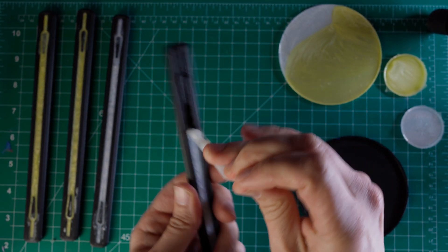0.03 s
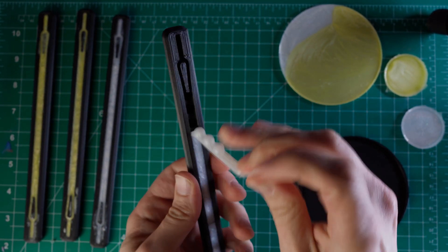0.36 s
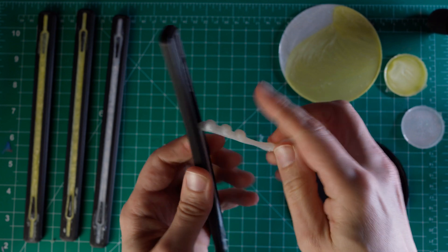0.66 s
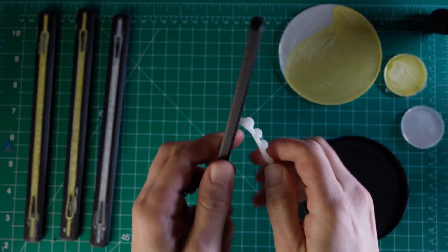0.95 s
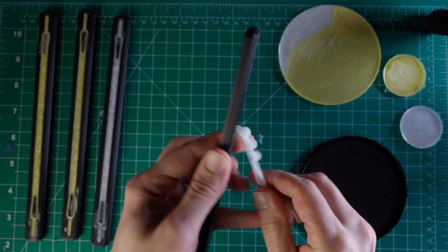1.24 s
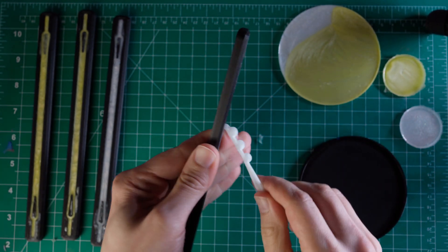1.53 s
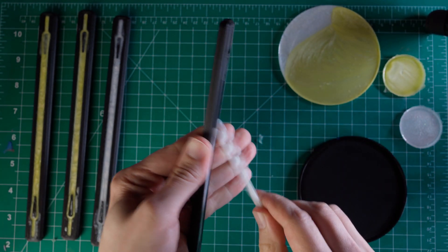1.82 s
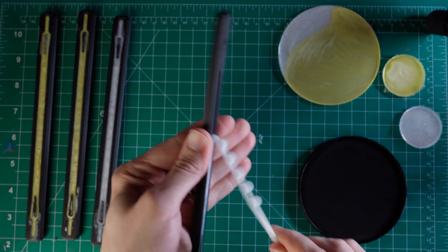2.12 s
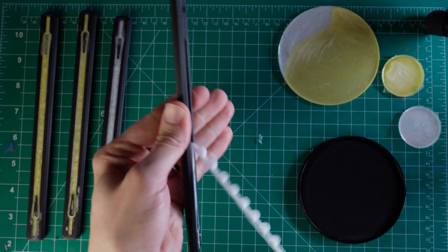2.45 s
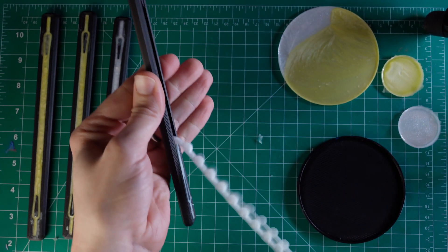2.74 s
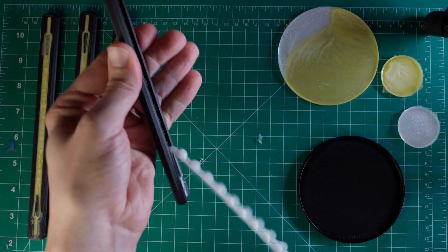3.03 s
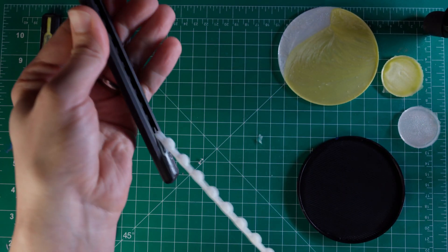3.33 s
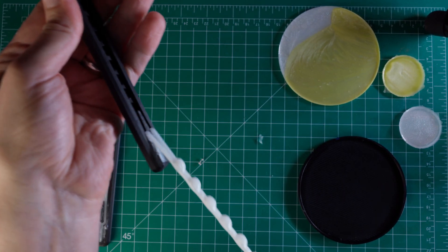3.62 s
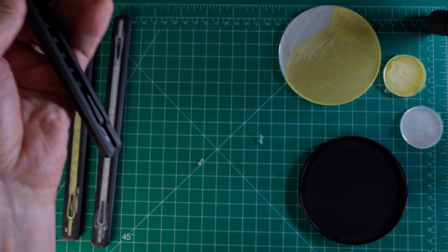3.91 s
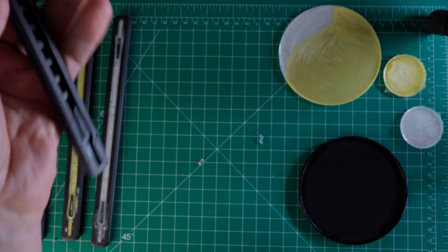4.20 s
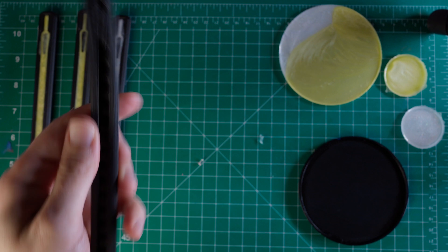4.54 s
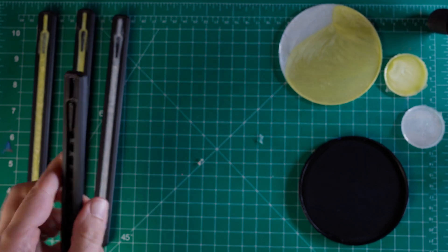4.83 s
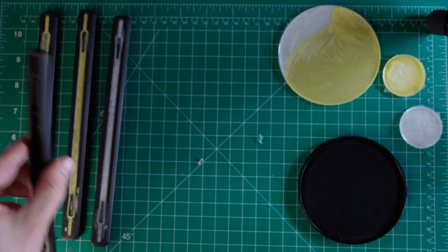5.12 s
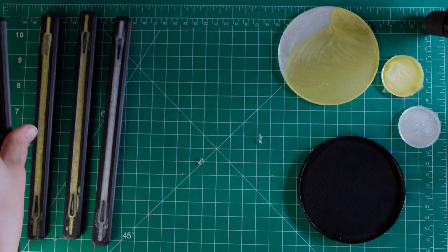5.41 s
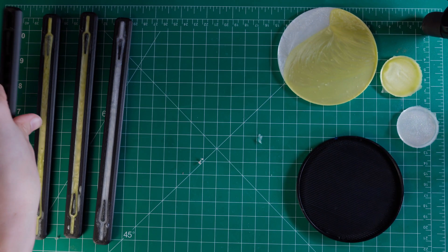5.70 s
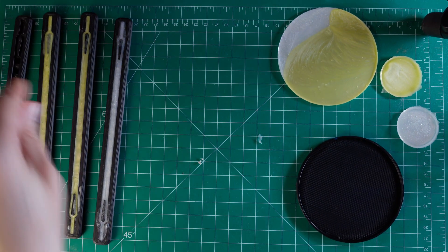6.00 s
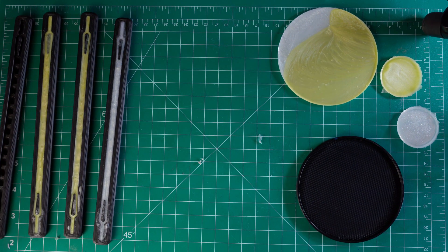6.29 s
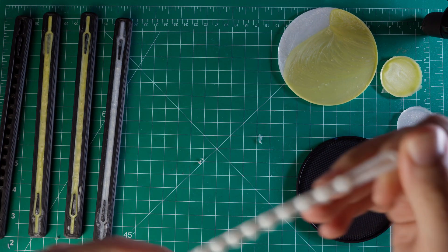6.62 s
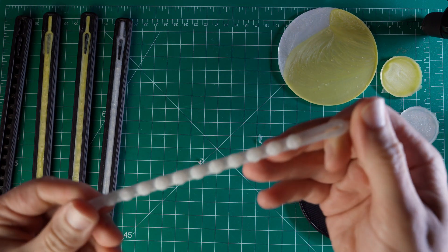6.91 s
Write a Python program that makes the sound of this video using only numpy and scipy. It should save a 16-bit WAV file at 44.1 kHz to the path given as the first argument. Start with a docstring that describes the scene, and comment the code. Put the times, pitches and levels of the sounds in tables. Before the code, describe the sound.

Hands peel a beaded rubber strap out of a long mould, close to the microphone in a small room. Each bead tears loose with a sticky crackle, a sharp pop and a snap, sparse at first and then in a quick run, over hiss and a low bending rumble. The tail rips free with a bright crack. After a lull, the empty mould knocks on the desk and clatters down.

```python
"""A beaded rubber strap is peeled by hand out of a long mould, close by, above a desk in a small room.
Each bead tears loose with a sticky crackle, its pocket pops open and the rubber snaps back.
The strap's ends rip free and flap; the bending mould rumbles.
A steady background hiss swells with each bend and fades after the peeling.
The empty mould is then knocked on the desk, rings, and clatters down beside the others."""
import sys
import numpy as np
from scipy import signal
from scipy.fft import rfft, irfft
from scipy.io import wavfile
from scipy.ndimage import uniform_filter1d

SR = 44100
rng = np.random.default_rng(int(sys.argv[2]) if len(sys.argv) > 2 else 0)


def pcm_store(signal):
    """Save signal as 16-bit PCM."""
    levels = np.round(np.clip(np.atleast_2d(signal), -1, 1) * 32767)
    wavfile.write(sys.argv[1], SR, levels.astype(np.int16).T)


N = 306495
T = np.arange(N) / SR

# Beads leaving their pockets. Each row: time in seconds, pop level in dB, pocket pitch in Hz,
# snap delay in seconds, snap level in dB.
BEAD_RELEASES = [(0.0403, -6, 8220, 0.0024, -12), (.347, -17.5, 7000, 0.0091, -18.5),
                 (1.8799, -12.5, 8910, 0.0096, -21.5), (2.154, -6, 7640, .0046, -12.5),
                 (2.247, -11, 8060, 0.0024, -11), (2.3462, -6, 8470, 0.006, -12),
                 (2.468, -7, 8320, 0.0035, -9), (2.6308, -5.5, 8105, 0.0032, -9),
                 (2.7165, -22, 8900, 0.0016, -9), (2.83, -5.5, 8740, 0.0029, -13),
                 (2.972, -9, 8880, 0.0045, -7), (3.0646, -7.5, 9080, 0.0035, -11),
                 (3.174, -18.5, 8530, 0.0016, -26)]


def undb(db):
    """Decibels to gain."""
    return 10 ** (np.asarray(db) / 20)


def unit(x):
    """Scale to rms 1."""
    return x / np.sqrt(np.mean(x ** 2))


def add(track, start_s, sound):
    """Mix a sound into a track."""
    start = int(start_s * SR)
    sound, start = sound[max(-start, 0):], max(start, 0)
    track[start:start + len(sound)] += sound[:N - start]


def butter(x, order, hz, kind="low"):
    """Butterworth filter."""
    return signal.sosfilt(signal.butter(order, hz, kind, fs=SR, output="sos"), x)


def colour(x, points, size=4096):
    """Minimum-phase filter through (Hz, dB) points; keeps the power of white noise."""
    hz, db = np.transpose(points)
    grid_hz = np.maximum(np.arange(size // 2 + 1) * SR / size, 1)
    gain = undb(np.interp(np.log(grid_hz), np.log(hz), db))
    cepstrum = irfft(np.log(gain))
    cepstrum[1:size // 2] *= 2
    cepstrum[size // 2 + 1:] = 0
    response = irfft(np.exp(rfft(cepstrum)))
    return signal.fftconvolve(x, response / np.linalg.norm(response))[:len(x)]


def resonate(x, hz, width_hz):
    """One resonance, gain 1 at its centre."""
    q = hz / min(width_hz, .3 * SR)
    return signal.lfilter(*signal.iirpeak(min(hz, .45 * SR), q, SR), x)


def grit(size, spread_db):
    """Noise of tiny clicks of uneven size."""
    return unit(rng.standard_normal(size) * undb(spread_db * np.minimum(rng.exponential(size=size), 5)))


def walk(rate_hz):
    """Slow random wander, rms 1."""
    hold = int(SR / rate_hz)
    steps = np.repeat(rng.standard_normal(N // hold + 1), hold)
    return unit(uniform_filter1d(uniform_filter1d(steps, hold), hold)[:N])


def burst(noise, decay_s):
    """Decaying noise whose energy depends only on the decay time."""
    fade = np.exp(-T[:len(noise)] / decay_s)
    return noise * fade * np.linalg.norm(fade) / np.linalg.norm(noise * fade)


def ring(hz, scatter, decay_s, size=4096):
    """Damped sine, randomly detuned."""
    pitch_hz = hz * (1 + scatter * rng.standard_normal())
    return np.sin(2 * np.pi * pitch_hz * T[:size]) * np.exp(-T[:size] / decay_s)


def envelope(start_s, end_s, attack_s, release_s):
    """Swell up to the start, hold to the end, die away."""
    return np.exp(np.minimum(T - start_s, 0) / attack_s - np.maximum(T - end_s, 0) / release_s)


def panned(db):
    """Stereo gains, left above right by db."""
    return undb(np.array([[db], [-db]]) / 2)


def stereo_noise(points, side_db, grain_db):
    """Coloured noise, wider in the bass."""
    mid, side = (colour(grit(N, grain_db), points) for _ in range(2))
    side = undb(side_db) * side + .26 * butter(side, 1, 200)
    return unit(mid + side * np.array([[1], [-1]]))


def force_db(pop_db, snap_db):
    """How hard a bead was held: mean power of its pop and snap."""
    return 10 * np.log10((undb(pop_db) ** 2 + undb(snap_db) ** 2) / 2)


def room_air(level_db=-57.5):
    """Still air of the room: faint steady noise."""
    # Each row: frequency in Hz, level in dB.
    air_spectrum = [(20, -2.5), (46, -1.5), (110, -10), (300, -11), (780, -20), (1800, -26), (3000, -27.5),
                    (6000, -32), (9000, -27.5), (16000, -30.5)]
    return undb(level_db) * stereo_noise(air_spectrum, side_db=-5, grain_db=.2)


def room(x, onset_s=.0017, size=32768):
    """Diffuse tail of a small room, partly unlike in the two ears, treble dying first."""
    # Each row: frequency in Hz, t60 in seconds.
    decay_times = [(200, 0.53), (1500, 0.39), (4000, .48), (9000, 0.31), (16000, 0.21)]
    noise = rng.standard_normal(size) + .85 * rng.standard_normal((2, size))
    hz, t, cells = signal.stft(noise, SR, nperseg=256)
    t60_s = np.interp(hz, *np.transpose(decay_times))[:, None]
    tail = signal.istft(cells * np.exp(-np.log(1000) * t / t60_s), SR)[1][:, :size]
    tail *= 1 - np.exp(-(T[:size] / onset_s) ** 2)
    return signal.fftconvolve(x[None], tail / np.linalg.norm(tail[0]), axes=1)[:, :N]


def place(x, pan_db, scatter_db, room_db, paths=4, size=512):
    """Direct sound, room, and scatter off the moving hands that parts left from right."""
    scatter = np.zeros(N)
    for _ in range(paths):
        taps = burst(rng.standard_normal(size), decay_s=.0015)
        reflection = signal.fftconvolve(x, taps / np.linalg.norm(taps))[:N]
        scatter += walk(rate_hz=4.5) * reflection / np.sqrt(paths)
    side = undb(scatter_db) * scatter * np.array([[1], [-1]])
    return x * panned(pan_db) + side + undb(room_db) * room(x)


def desk_echo(x, delay_s=.0115, level_db=-11.5, cutoff_hz=900):
    """Dull reflection off the desk."""
    echo = np.zeros(N)
    add(echo, delay_s, undb(level_db) * butter(x, 2, cutoff_hz))
    return echo


def bending(work, rest_db=-73, work_db=-53.5, bead_db=-31):
    """Amplitude of the mould's rumble: steady work, a flex per bead, a swell per shift of grip."""
    # Each row: centre in seconds, level in dB, half length in seconds.
    grip_shifts = [(0.092, -37, 0.024), (3.218, -35.5, 0.12), (3.862, -37, 0.054), (4.78, -48.5, 0.059),
                   (5.118, -49.5, 0.18), (5.89, -44.5, 0.13)]
    power = undb(rest_db) ** 2 + (undb(work_db) * work) ** 2
    for at_s, pop_db, _, _, snap_db in BEAD_RELEASES:
        flex = envelope(at_s, at_s, attack_s=.03, release_s=.19)
        power += (undb(force_db(pop_db, snap_db) + bead_db) * flex) ** 2
    for at_s, db, half_s in grip_shifts:
        power += undb(db) ** 2 * np.exp(-2 * ((T - at_s) / half_s) ** 2)
    return np.sqrt(power)


def hiss_and_rumble(rest_db=-64, work_db=-54, swell_db=-20):
    """The bending mould rumbles; a background hiss swells with each bend and fades after the peeling."""
    # Each row of both: frequency in Hz, level in dB.
    hiss_spectrum = [(12, -39.5), (20, 1), (43, 1), (146, -6), (182, -6), (262, -7), (337, -7.5),
                     (399, -11.5), (1090, -20), (2260, -25), (6180, -27.5), (10200, -24), (16000, -31)]
    rumble_spectrum = [(15, 1.5), (45, -1), (75, -4), (140, -9), (240, -16), (600, -37.5), (1500, -53)]
    work = envelope(0, end_s=4.04, attack_s=1, release_s=.2)
    bend = bending(work)
    hiss = stereo_noise(hiss_spectrum, side_db=-3.5, grain_db=1.2)
    hiss /= butter(hiss, 4, 4000, "high").std()  # hiss levels refer to the band above 4 kHz
    hiss_level = np.sqrt(undb(rest_db) ** 2 + (undb(work_db) * work) ** 2 + (undb(swell_db) * bend) ** 2)
    flicker = undb(.5 * walk(rate_hz=25))
    rumble = bend * stereo_noise(rumble_spectrum, side_db=-14, grain_db=.3)
    return (hiss * hiss_level * flicker + rumble) * panned(1.7)


def fingers(start_s=.2, end_s=3.7, softest_db=-53, count=80, size=2048):
    """Fingertips slip on the rubber in faint scuffs of random pitch and length."""
    out = np.zeros(N)
    for when, pitch, force, length in rng.random((count, 4)):
        hz = 1800 * 7 ** pitch
        friction = unit(resonate(grit(size, 3), hz, width_hz=hz))
        scuff = burst(friction, decay_s=.00055 + .0048 * length ** 2)
        add(out, start_s + when * (end_s - start_s), undb(softest_db + 7 * force) * scuff)
    return out


def mould_ring(scatter, size, damping_s=.034, buzz=.06):
    """Modes of the struck mould, damped by hand and mat."""
    # Each row: frequency in Hz, level in dB, t60 in seconds before that damping.
    mould_modes = [(547.4, -12.5, 0.063), (796, -11, 0.11), (1204, -7.5, 0.088), (1269, -8.5, 0.15),
                   (1339, -2.5, .06), (1864, -10, 0.056), (2144, -9, 0.04), (2310, -7.5, 0.022),
                   (2840, -13, .03), (3070, -18.5, 0.025), (3340, -7, 0.023), (4150, -16.5, 0.032),
                   (4510, -17.5, 0.0298)]
    hz, db, t60_s = np.transpose(mould_modes)[:, :, None]
    t = T[:size]
    detune, strike = rng.standard_normal((2, len(hz), 1))
    # The loose contact buzzes, blurring the upper modes most.
    blur = buzz * hz / hz.mean() * np.cumsum(rng.standard_normal((len(hz), size)), axis=1)
    phase = 2 * np.pi * hz * (1 + scatter * detune) * t + blur
    fade = np.exp(-np.log(1000) * t / t60_s - t / damping_s)
    modes = undb(db + 1.5 * strike) * np.cos(phase) * fade
    return modes[::2].sum(0) - modes[1::2].sum(0)


def mould_blows(drop_s=5.7, skid_db=-25.5, size=8192):
    """The mould hits the desk and its neighbours: each contact cracks and rings it; it skids to rest."""
    # Each row: start in seconds, level in dB, contact cut-off in Hz.
    blows = [(5.4501, -10, 4070), (5.4593, -18, 2600), (5.8040, -5, 5000), (5.8381, -0.5, 4064),
             (5.8449, -12, 5500), (5.8620, -9, 12000), (5.8816, -6, 4443), (5.9101, -6, 10970),
             (5.9169, -7.5, 11000), (5.9223, -9.5, 6000), (5.9335, -12, 12000), (5.9519, -6.5, 3910)]
    # Each row: frequency in Hz, level in dB.
    contact_spectrum = [(60, -20.5), (200, -10), (350, -11), (600, -6.5), (1000, -2), (2000, -0.5),
                        (2600, -7), (3600, -4.5), (5000, -11.5), (9000, -7), (16000, -22)]
    rings, cracks = np.zeros((2, N))
    for at_s, db, cutoff_hz in blows:
        # Held, it rings true; once dropped, each contact weakens and shifts its modes.
        ring_db, scatter = (1, .005) if at_s < drop_s else (-17, .09)
        add(rings, at_s, undb(db + ring_db) * mould_ring(scatter, size))
        contact = burst(grit(size, 2.5), decay_s=.0026)
        add(cracks, at_s, undb(db) * butter(contact, 3, cutoff_hz))
        add(cracks, at_s, undb(db - 18) * np.diff(contact[:48]))  # bright click of first touch
    sliding = undb(skid_db) * envelope(start_s=5.852, end_s=5.945, attack_s=.004, release_s=.028)
    skid = sliding * grit(N, 2.5)
    desk_shake = sliding * undb(-13.5) * unit(resonate(rng.standard_normal(N), hz=130, width_hz=300))
    radiated = butter(rings, 5, [400, 4700], "band")  # a slim bar: no deep bass or high treble
    return radiated + desk_shake + colour(cracks + skid, contact_spectrum)


def strap_slaps(size=4096):
    """The strap's head, later its tail, rips free with a bright crack and flaps dully on the mould."""
    # Each row: start in seconds, crack level in dB, flap level in dB, decay in seconds.
    slaps = [(.0405, -33, -26.5, 0.0051), (3.7787, -18.5, -39.5, 0.01), (3.8433, -8.5, -28.5, 0.0021),
             (3.855, -31.5, -26, 0.011), (3.8700, -28, -29.5, 0.0081), (3.8811, -17.5, -26, 0.0028)]
    # Each row of both: frequency in Hz, level in dB.
    crack_spectrum = [(100, -49.5), (700, -24), (1300, -18), (2100, -5.5), (3200, -13), (4800, -6.5),
                      (7000, -6.5), (10000, -8), (16000, -9)]
    flap_spectrum = [(60, -40), (200, -5.5), (900, 2), (1600, -6), (3000, -29), (16000, -59)]
    cracks, flaps = np.zeros((2, N))
    for at_s, crack_db, flap_db, decay_s in slaps:
        add(cracks, at_s, undb(crack_db) * burst(grit(size, .91), decay_s))
        add(flaps, at_s, undb(flap_db) * burst(rng.standard_normal(size), decay_s))
    return colour(cracks, crack_spectrum) + colour(flaps, flap_spectrum)


def tick(hz, decay_s, attack_s=.00056, groove_db=-3, size=2048):
    """A tacky spot parts: a crackle in a narrow gap, which also rings the groove."""
    crackle = grit(size, 3) * (1 - np.exp(-T[:size] / attack_s))
    gap = resonate(resonate(crackle, hz, .498 * hz), hz, .64 * hz)
    groove = undb(groove_db) * resonate(crackle, hz=2540, width_hz=1500)
    return burst(unit(gap + groove), decay_s)


def lone_ticks(decay_cycles=23):
    """Tacky rubber lets go in single spots; low ticks last longer."""
    # Each row: start in seconds, level in dB, centre in Hz.
    ticks = [(0.018, -22, 10400), (.076, -24.5, 9300), (.081, -16.5, 8900), (0.2018, -32, 8260),
             (0.2241, -39.5, 3080), (.297, -35.5, 8600), (.415, -38, 9000), (.652, -44.5, 2980),
             (0.674, -45, 2000), (.842, -37, 9500), (1.068, -48, 1500), (1.2987, -31, 8100),
             (1.301, -38.5, 3330), (1.7345, -36.5, 9700), (2.204, -29.5, 9600), (2.389, -28, 8000),
             (2.9493, -18.5, 9500), (3.3424, -28, 9600), (3.353, -43, 3060), (3.504, -37.5, 9600),
             (3.651, -34, 6000), (4.371, -50, 3940), (4.4253, -42.5, 7060)]
    out = np.zeros(N)
    for at_s, db, hz in ticks:
        add(out, at_s, undb(db) * tick(hz, decay_cycles / hz))
    return out


def warning_cracks(early_s=.036, late_s=.003, relative_db=-12, growth_db_per_s=352.5, count=4):
    """Ticks ahead of each pop, growing as strain builds on the bead."""
    out = np.zeros(N)
    for at_s, pop_db, _, _, snap_db in BEAD_RELEASES:
        for k in range(count):
            lead_s = late_s + (early_s - late_s) * (k + rng.random()) / count
            db = force_db(pop_db, snap_db) + relative_db - growth_db_per_s * lead_s
            add(out, at_s - lead_s, undb(db) * tick(hz=9600, decay_s=.0018))
    return out


def squeak(hz, rise_s=.0034, fall=.6, glide_s=.013, width_hz=1100, size=2048):
    """The gap under a lifting bead grows: a rough whistle swells and falls to the pocket's pitch."""
    rough = butter(rng.standard_normal((2, size)), 2, width_hz)
    pitch_hz = hz * (1 + fall * (1 - np.exp(-T[:size] / glide_s)))
    phase = 2 * np.pi * np.cumsum(pitch_hz) / SR
    whistle = unit(rough[0] * np.cos(phase) + rough[1] * np.sin(phase))
    return burst(whistle, rise_s)[::-1]  # built backwards from the pop


def pocket_pop(hz, gap_s=.0026, step_db=-4, swell_s=.00034, glide=.0635, gulps=3, size=1024):
    """A pocket opens in quick gulps; its air rings higher as the mouth widens."""
    out = np.zeros(size)
    for k in range(gulps):
        jitter, detune = rng.standard_normal(2)
        age = np.maximum(T[:size] - k * gap_s * (1 + .023 * jitter), 0) / swell_s
        pitch_hz = hz * (1 + glide * k + .0338 * detune + .3 * rng.standard_normal(size))
        swell = undb(k * step_db) * age * np.exp(1 - age)
        out += swell * np.sin(2 * np.pi * np.cumsum(pitch_hz) / SR)
    return np.sqrt(2) * out


def beads(tear_s=.009, snap_s=.003, drag_s=.012, size=4096):
    """Tearing builds to each pop; the rubber snaps back, drags on the groove's lip, thumps the wall."""
    # Each row of both: frequency in Hz, level in dB.
    tear_spectrum = [(400, -30.5), (1500, -28), (2250, -4.5), (3300, -4.5), (5600, -0.5), (8200, -7),
                     (10000, -0.5), (12500, -2), (16000, -22)]
    snap_spectrum = [(150, -14), (500, -16), (1400, -11), (2200, 6), (3300, -4.5), (5400, -12.5),
                     (8000, 8.5), (10500, 10.5), (13000, -4), (16000, -25.5)]
    pops, tears, snaps, thumps = np.zeros((4, N))
    for at_s, pop_db, hz, delay_s, snap_db in BEAD_RELEASES:
        held_db = force_db(pop_db, snap_db)
        tearing, snapping, dragging = grit(size, 4.5), grit(size, 2.5), grit(size, 4.5)
        add(tears, at_s - size / SR + .002, undb(held_db - 23) * burst(tearing, tear_s)[::-1])
        whistle = squeak(hz)
        add(pops, at_s - len(whistle) / SR, undb(pop_db - 16) * whistle)
        add(pops, at_s - .0005, undb(pop_db) * pocket_pop(hz))
        hollow_groove = ring(hz=2250, scatter=.16, decay_s=.0018)
        add(pops, at_s, undb(pop_db - 16) * hollow_groove)
        recoil_s = at_s + delay_s
        add(snaps, recoil_s - .0005, undb(snap_db) * burst(snapping, snap_s))
        add(snaps, recoil_s, undb(snap_db - 24.5) * burst(dragging, drag_s))
        add(thumps, recoil_s - .002, undb(held_db - 17) * ring(hz=607, scatter=.069, decay_s=.0046))
        add(thumps, recoil_s, undb(held_db - 26) * ring(hz=170, scatter=.26, decay_s=.018))
    return pops + colour(tears, tear_spectrum) + colour(snaps, snap_spectrum) + thumps


def scene():
    """Peeling close by, knocks further off on the desk."""
    peel = beads() + lone_ticks() + warning_cracks() + fingers()
    return (place(peel + desk_echo(peel), pan_db=1.7, scatter_db=-10, room_db=-15)
            + place(strap_slaps(), pan_db=3.5, scatter_db=-5, room_db=-11.5)
            + place(mould_blows(), pan_db=1.3, scatter_db=-11, room_db=-9.5)
            + hiss_and_rumble() + room_air())


def record(dry):
    """Clip at full scale, low-pass at 16 kHz."""
    lowpass = signal.ellip(8, .2, 70, 16000, fs=SR, output="sos")
    return signal.sosfilt(lowpass, np.clip(dry, -1, 1))


dry = scene()
out = record(dry)
pcm_store(out)
```